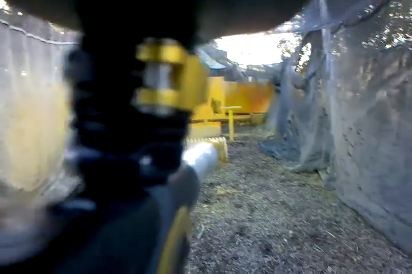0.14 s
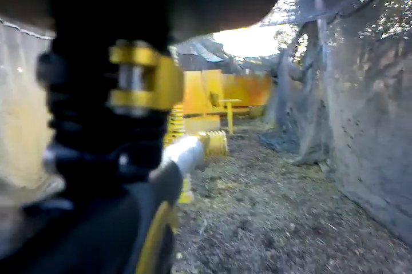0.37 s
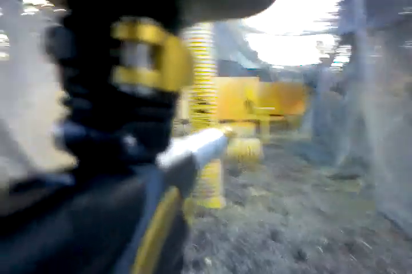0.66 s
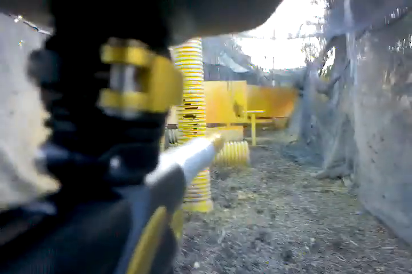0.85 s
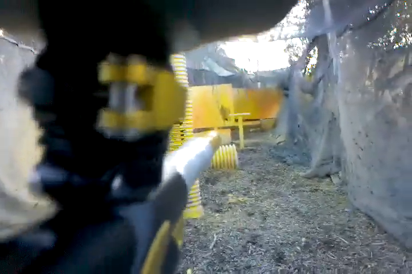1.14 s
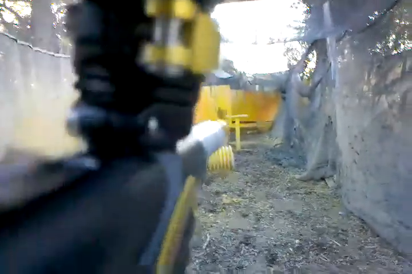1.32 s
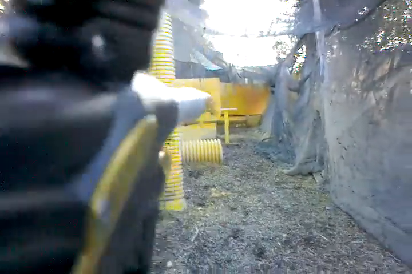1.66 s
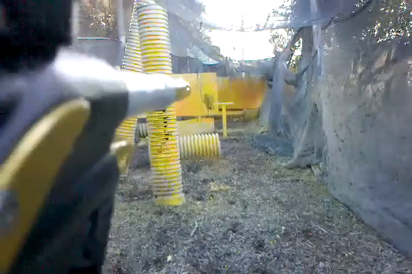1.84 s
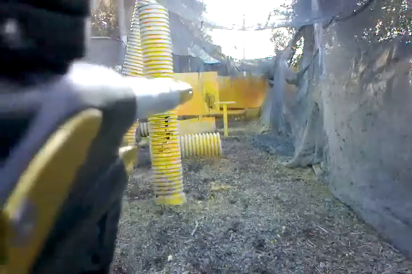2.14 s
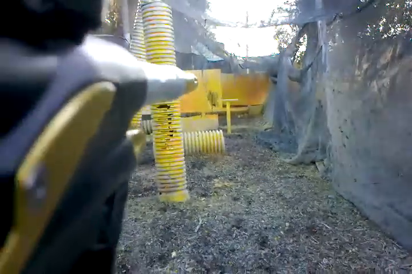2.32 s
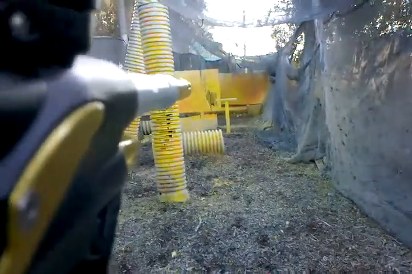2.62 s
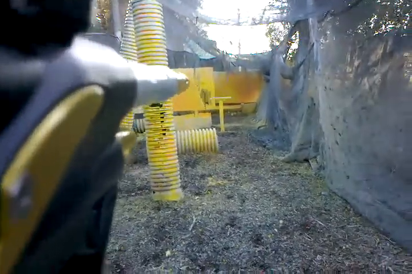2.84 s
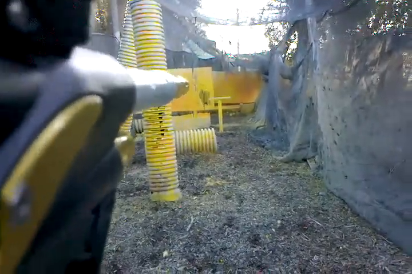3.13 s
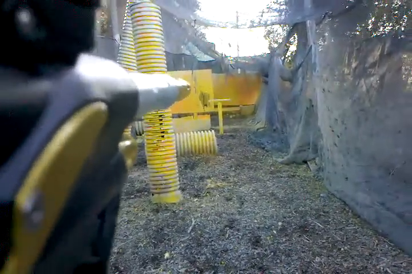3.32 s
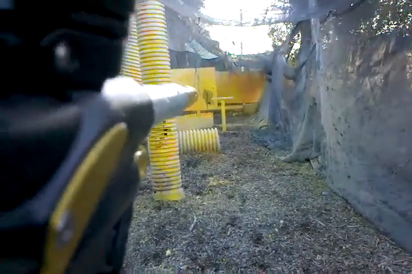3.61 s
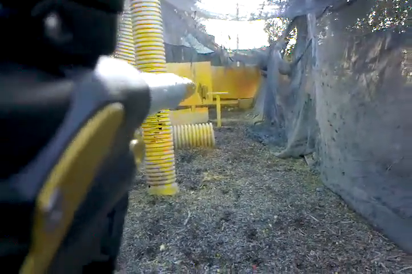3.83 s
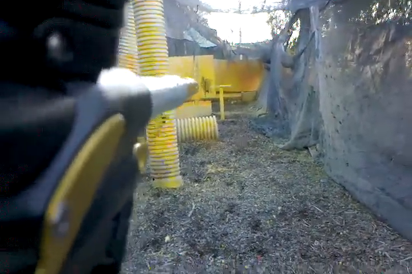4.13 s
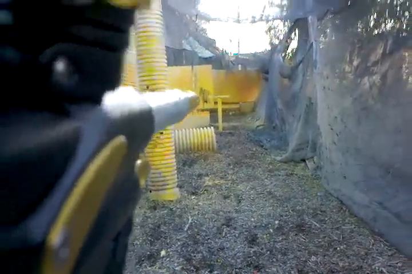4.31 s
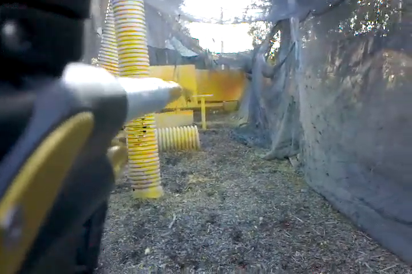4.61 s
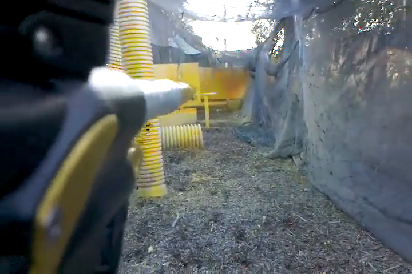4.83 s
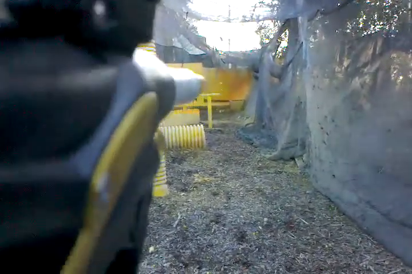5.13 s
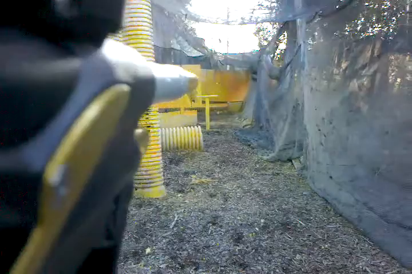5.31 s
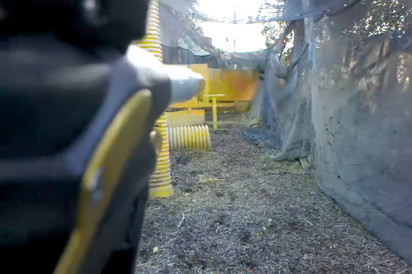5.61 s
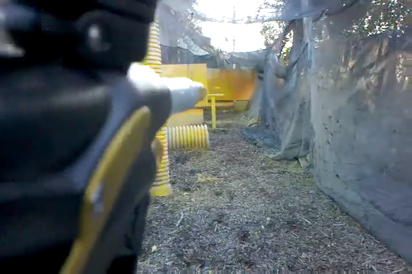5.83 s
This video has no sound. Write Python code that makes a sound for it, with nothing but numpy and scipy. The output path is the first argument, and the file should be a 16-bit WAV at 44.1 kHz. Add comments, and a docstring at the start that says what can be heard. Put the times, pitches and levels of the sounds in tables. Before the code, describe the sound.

A paintball gun gives a few small clicks as it is handled right beside the microphone. It fires two sharp pops, then a long, very fast string of shots, each with a mechanical clack and a spit of gas. Balls smack faintly on distant targets, and the netted outdoor lane adds a short echo. The shots overload the microphone and sound harsh, with little high treble.

```python
"""First come a few small clicks as a paintball marker (a gas-powered gun) is handled beside the microphone.
Then it fires two shots and a long, fast string down a netted outdoor lane. In each shot the bolt (a
sliding metal part) clacks forward, the valve pops, gas rushes from the barrel, the bolt returns and
the ball smacks a distant target. The lane adds a short echo over faint outdoor noise.
The shots overload the microphone, which picks up little high treble."""
import sys
import numpy as np
from scipy import signal
from scipy.fft import rfft, irfft, next_fast_len
from scipy.io import wavfile

SR = 44100
rng = np.random.default_rng(int(sys.argv[2]) if len(sys.argv) > 2 else 0)


def to_wav(s):
    """Save 16-bit WAV."""
    ch = np.atleast_2d(s).T  # columns
    pcm = np.round(np.clip(ch, -1, 1) * 32767)  # PCM
    wavfile.write(sys.argv[1], SR, pcm.astype(np.int16))


N = 263026

# evenly paced runs of trigger pulls, each broken by a hurried or late pull:
# (first shot [s], shots [count], time between shots [s], kick level [dB])
TRIGGER_RUNS = [(1.401, 2, 0.2092, -2.8), (1.7355, 2, 0.0594, -1.2), (1.8383, 14, 0.0569, 0.6),
                (2.6417, 6, 0.0582, 0.9), (2.9873, 5, 0.059, 0.7), (3.2747, 7, 0.0559, 1.8),
                (3.6692, 6, 0.0575, -2.5), (4.0031, 2, 0.0537, -1.2), (4.1132, 3, 0.0633, -3.8),
                (4.295, 6, 0.0575, -1.5), (4.6319, 6, 0.0576, -1.7), (5.018, 6, 0.0555, 0.2),
                (5.341, 4, 0.054, 4.5), (5.5639, 4, 0.0548, 1.4), (5.8209, 3, 0.0573, 0.6)]
# the bolt's metal contacts in one shot: (time from the valve opening [s], level [dB])
BOLT_CONTACTS = [(-.012, -.5), (-.0097, -2.5), (-.0056, -11.5), (.0188, -7), (.0284, -11.5)]
# notes of the struck marker body: (pitch [Hz], level [dB], fade time [s])
# a fade time, called t60 below, is how long a sound takes to drop by 60 dB
BODY_NOTES = [(175, -20, .022), (300, -16, .016), (520, -19, .012), (730, -12, .011), (1150, -15, .009),
              (1600, -8, .009), (2130, -11, .008), (2500, -7, .008), (2850, -7, .008), (3480, -8, .008),
              (3900, -13, .008), (6400, -19, .007)]
# notes of the air in the barrel and its mouth, the muzzle: (pitch [Hz], level [dB], fade time [s])
BARREL_NOTES = [(211.6, -21.5, 0.12), (304, -13, 0.068), (421.5, -21.5, 0.17), (592, -7.5, 0.022),
                (762, -5.5, 0.029), (873, -15.5, 0.03), (1040, -9, 0.017), (1160, -5.5, 0.026),
                (1485.5, -5, 0.038), (1610, -6, 0.031), (1848, -12.5, 0.069), (2017, -11.5, 0.071),
                (2160, -9.5, 0.036), (2387, -5, 0.033), (2623, -10, 0.068), (3976, -10, 0.052)]
# tone colour of the gas jet: (frequency [Hz], level [dB])
JET_COLOUR = [(25, -36), (70, -12), (150, 2), (300, 0.5), (600, -2.5), (1200, -1.5), (1600, 2), (2600, 4),
              (3400, 0.5), (5000, -5), (6300, -1.5), (7200, -9.5)]
# whistles of the jet in the barrel's side holes: (pitch [Hz], width [Hz], level against the jet [dB])
PORT_WHISTLES = [(825, 110, 0.5), (1577, 110, -8.5), (2970, 220, -13.5), (3830, 130, -4), (4490, 150, -6),
                 (4220, 180, -1), (4740, 130, -16)]
# handling clicks: (time [s], snap level [dB], pitch [Hz], rustle level [dB])
HANDLING_CLICKS = [(0.177, -39, 3260, -49.5), (0.2457, -32, 2500, -58), (0.6016, -17.5, 4850, -47),
                   (0.661, -14, 3170, -49), (.9315, -43, 2600, -55), (1.001, -38, 1800, -63),
                   (1.012, -33, 2020, -66)]
# how strongly the lane answers as the marker comes up to aim: (time [s], level [dB])
AIM_LEVELS = [(1.42, -11.5), (1.63, -7), (1.85, -4), (5.9, -3.5)]
# tone colour of the lane's echo: (frequency [Hz], level [dB])
ECHO_COLOUR = [(40, -16), (160, 15), (450, 8), (1000, 9.5), (2200, 10.5), (4000, 2.5), (7000, -2)]
# how long that echo lasts: (frequency [Hz], fade time [s])
ECHO_FADES = [(100, .3), (500, .45), (2200, .47), (7000, .44)]
# tone colour of distant outdoor noise: (frequency [Hz], level [dB])
OUTDOOR_COLOUR = [(18, -81), (30, -45), (150, -5), (169, -11.5), (252, -10.5), (276, -11), (570, -14),
                  (829, -10.5), (1420, -20), (1710, -20), (3530, -25), (3790, -29), (6790, -39),
                  (8000, -70), (10400, -100), (17600, -120)]

UNEVEN_DB = 1.5  # typical random change in level from shot to shot
BALL_EXIT_S = .0068  # from the valve opening until the ball leaves the muzzle


def trigger():
    """A slightly unsteady finger pulls the trigger; gives the time and kick level of every shot."""
    times, kick_db = np.transpose([(start + k * interval, db)
                                   for start, count, interval, db in TRIGGER_RUNS
                                   for k in range(int(count))])
    late, hard = rng.standard_normal((len(times), 2)).T
    return times + .0005 * late, kick_db + 1.6 * hard


def bolt(shots, level_db, rattle_db):
    """The bolt strikes the body several times a shot; the body rings and loose parts rattle."""
    delay, contact_db = np.transpose(BOLT_CONTACTS)
    jitter_s = .00005 * rng.standard_normal((len(shots), len(delay)))
    times = (shots[:, None] + delay + jitter_s).ravel()
    force_db = np.tile(contact_db, len(shots)) + level_db
    out = from_db(rattle_db) * burst(clicks(times, force_db), hz=2600, width_hz=1800, t60=.022)
    for k, (hz, db, t60) in enumerate(BODY_NOTES):
        strikes = clicks(times, force_db + db + UNEVEN_DB * rng.standard_normal(len(times)))
        out += (-1) ** k * ring(strikes, hz, t60)  # every other note swings the opposite way
    return out


def valve_pop(shots, detune):
    """A jump in pressure rings the air in the barrel; gas temperature shifts the pitches each shot."""
    hz, db, t60 = np.transpose(BARREL_NOTES)[:, :, None]
    t = np.arange(SR // 10) / SR
    signs = (-1) ** np.arange(len(hz))[:, None]
    decay = signs * np.exp(-np.log(1000) * t / t60)
    out = np.zeros(N + len(t))
    for time in shots:
        sharp, loud = rng.standard_normal((2, len(hz), 1))
        start = round(time * SR)
        notes = from_db(db + UNEVEN_DB * loud) * decay * np.sin(2 * np.pi * hz * (1 + detune * sharp) * t)
        out[start:start + len(t)] += notes.sum(axis=0)
    return out[:N]


def recoil(shots, kick_db):
    """The kick thumps the frame and puffs air; the first shot adds a hollow boom and a faint ring."""
    thump = swell(shots, kick_db - 15, hz=174, peak_s=.0091, width_s=.0057)
    puff = burst(clicks(shots + .004, kick_db - 22.5), hz=100, width_hz=60, t60=.07)
    boom = swell(shots[:1], db=-3, hz=374, peak_s=.012, width_s=.0025)
    metal_ring = ring(clicks(shots[:1], db=-35), hz=468, t60=1.1)
    return thump + puff + boom + metal_ring


def gas_flow(rise_s=.00066, open_s=.021, sag_db_per_s=90, close_db_per_s=2900):
    """Gas starts fast, surges as the ball leaves, sags while the valve is open, then dies away."""
    t = np.arange(SR // 25) / SR
    fall_db = sag_db_per_s * t + close_db_per_s * np.maximum(t - open_s, 0)
    surge = from_db(-3) * bell_curve(t, BALL_EXIT_S, width_s=.00067)
    return np.minimum(t / rise_s, 1) * from_db(-fall_db) + surge


def gas_jet(shots, level_db):
    """Swirling gas hisses out behind the ball and whistles in the barrel's side holes."""
    openings = clicks(shots, level_db + UNEVEN_DB * rng.standard_normal(len(shots)))
    jet = noise(JET_COLOUR) * signal.oaconvolve(openings, gas_flow())[:N]
    return jet + sum(from_db(db) * resonance(jet, hz, width) for hz, width, db in PORT_WHISTLES)


def muzzle_crack(shots, level_db):
    """A bright spit of noise comes as the ball clears the muzzle."""
    exits = clicks(shots + BALL_EXIT_S, level_db + UNEVEN_DB * rng.standard_normal(len(shots)))
    return burst(exits, hz=4370, width_hz=4100, t60=.0051)


def ball_hits(shots, delay_s, level_db, hz):
    """Each ball bursts far off, dulled by distance; the delay is its flight plus the sound's way back."""
    late, hard = rng.standard_normal((len(shots), 2)).T
    hits = clicks(shots + delay_s + .0007 * late, level_db + 2.5 * hard)
    smacks = burst(hits, hz, width_hz=1700, t60=.006)
    return resonance(smacks, hz, width_hz=2400)


def handling(ring_cycles=11):
    """The marker is raised: each click leaves a soft rustle of loose parts and a thin metallic ring."""
    out = np.zeros(N)
    for time, db, hz, _ in HANDLING_CLICKS:
        snap = ring(clicks(np.array([time]), db), hz, t60=ring_cycles / hz)
        out += resonance(snap, hz, width_hz=hz)
    times, _, _, rustle_db = np.transpose(HANDLING_CLICKS)
    out += burst(clicks(times, rustle_db), hz=3730, width_hz=1500, t60=.23)
    return out + from_db(2) * resonance(out, hz=3180, width_hz=25)


def lane_echo(sound, level_db, build_s):
    """Ground, nets and targets scatter the sound into a short echo; the bass fades first."""
    t = np.arange(SR) / SR
    hz = np.fft.rfftfreq(SR, 1 / SR)
    spectrum = rfft(rng.standard_normal(SR)) * from_db(at_hz(ECHO_COLOUR, hz))
    edges_hz = np.geomspace(30, 12000, 10)
    tail = np.zeros(SR)
    for low, high in zip(edges_hz, edges_hz[1:]):
        band = irfft(spectrum * (hz >= low) * (hz < high), SR)
        t60 = at_hz(ECHO_FADES, np.sqrt(low * high))
        tail += band * from_db(-60 * t / t60)
    tail *= 1 - np.exp(-t / build_s)
    tail /= np.sqrt(np.sum(tail ** 2))
    return from_db(level_db) * signal.fftconvolve(sound, tail)[:N]


def outdoors(level_db):
    """A faint, steady rush comes from far away."""
    return from_db(level_db) * noise(OUTDOOR_COLOUR)


def from_db(db):
    """Turn decibels into a number to multiply a sound by."""
    return 10 ** (np.asarray(db) / 20)


def at_hz(table, hz):
    """Read between the rows of a frequency table, giving every octave equal room."""
    known_hz, values = np.transpose(table)
    return np.interp(np.log(np.maximum(hz, 1)), np.log(known_hz), values)


def noise(colour):
    """Steady noise with the given tone colour and a typical size of 1."""
    size = next_fast_len(N, True)
    gain = from_db(at_hz(colour, np.fft.rfftfreq(size, 1 / SR)))
    shaped = irfft(rfft(rng.standard_normal(size)) * gain, size)[:N]
    return shaped / shaped.std()


def clicks(times, db):
    """A one-sample spike at each time."""
    out = np.zeros(N)
    at = np.round(times * SR).astype(int)
    inside = (at >= 0) & (at < N)
    heights = from_db(db) * np.ones(len(at))
    np.add.at(out, at[inside], heights[inside])
    return out


def ring(hits, hz, t60):
    """Each hit starts a pure tone that fades away."""
    decay = np.exp(-np.log(1000) / (t60 * SR))
    angle = 2 * np.pi * hz / SR
    return signal.lfilter([0, np.sin(angle)], [1, -2 * decay * np.cos(angle), decay ** 2], hits + 1e-18)


def resonance(sound, hz, width_hz):
    """Let through the band around one pitch and weaken the rest."""
    decay = np.exp(-np.pi * width_hz / SR)
    feedback = [1, -2 * decay * np.cos(2 * np.pi * hz / SR), decay ** 2]
    return signal.lfilter(np.array([1, 0, -1]) * (1 - decay ** 2) / 2, feedback, sound + 1e-18)


def burst(hits, hz, width_hz, t60):
    """Each hit releases a fading puff of noise around one pitch."""
    hiss = resonance(rng.standard_normal(N), hz, width_hz)
    decay = np.exp(-np.log(1000) / (t60 * SR))
    loudness = signal.lfilter([1], [1, -decay], hits + 1e-18)
    return loudness * hiss / hiss.std()


def bell_curve(t, peak_s, width_s):
    """A smooth hump of height 1."""
    return np.exp(-.5 * ((t - peak_s) / width_s) ** 2)


def swell(times, db, hz, peak_s, width_s):
    """A pressure wave a few swings long grows and fades after each time."""
    t = np.arange(SR // 20) / SR
    wave = bell_curve(t, peak_s, width_s) * np.sin(2 * np.pi * hz * t)
    return signal.oaconvolve(clicks(times, db), wave)[:N]


def scene():
    """Mix the marker close by, the targets far off, the lane's echo and the open air."""
    shots, kick_db = trigger()
    mechanism = bolt(shots, level_db=2, rattle_db=-24)
    mechanism += valve_pop(shots, detune=.0066) + recoil(shots, kick_db)
    blast = gas_jet(shots, level_db=-7.5) + muzzle_crack(shots, level_db=1)
    targets = ball_hits(shots, delay_s=.0715, level_db=-20.5, hz=2740)  # an obstacle
    targets += ball_hits(shots, delay_s=.102, level_db=-32, hz=1900)  # the backstop at the far end
    ticks = handling()
    # the muzzle points down the lane, so the echo is mostly made of its blast
    aim = from_db(np.interp(np.arange(N) / SR, *np.transpose(AIM_LEVELS)))
    into_lane = aim * (blast + from_db(-11) * mechanism) + from_db(2) * (targets + ticks)
    echo = lane_echo(into_lane, level_db=-16.5, build_s=.016)
    return (mechanism + blast + targets + ticks + echo + outdoors(level_db=-49.5))[None]


def record(dry):
    """The microphone loses deep bass and most high treble, and every shot overloads it."""
    ceiling, hardness = .7, 4.8  # where the peaks are flattened, and how sharply
    narrow = signal.sosfilt(signal.cheby1(6, .5, 6670, fs=SR, output="sos"), dry) + from_db(-11.5) * dry
    narrow = signal.sosfilt(signal.butter(2, 45, "high", fs=SR, output="sos"), narrow)
    clipped = narrow / (1 + np.abs(narrow / ceiling) ** hardness) ** (1 / hardness)
    below_treble = signal.sosfiltfilt(signal.butter(8, 7700, fs=SR, output="sos"), clipped)
    faint_treble = from_db(-18) * (clipped - below_treble)
    dulled = np.clip(below_treble + faint_treble, -ceiling, ceiling)
    return signal.sosfilt(signal.ellip(8, .2, 70, 16000, fs=SR, output="sos"), dulled)


dry = scene()
out = record(dry)
to_wav(out)
```